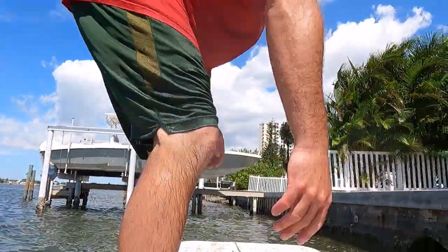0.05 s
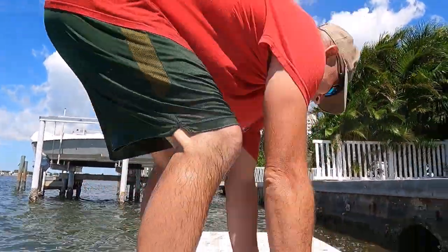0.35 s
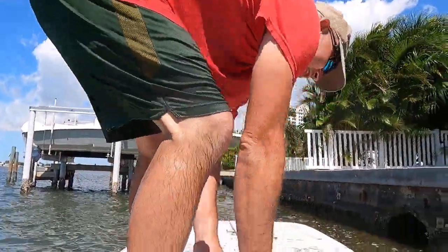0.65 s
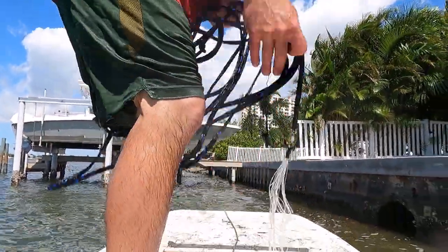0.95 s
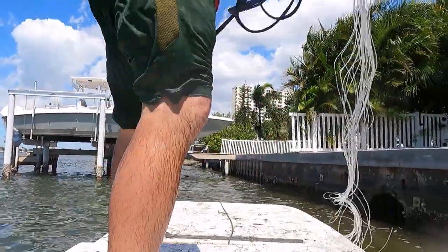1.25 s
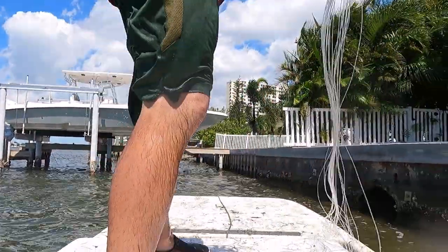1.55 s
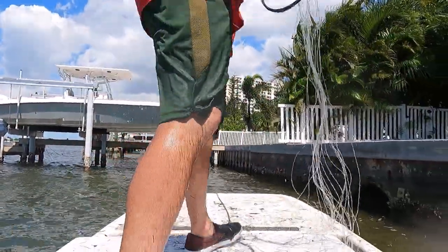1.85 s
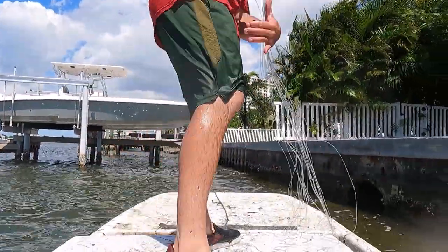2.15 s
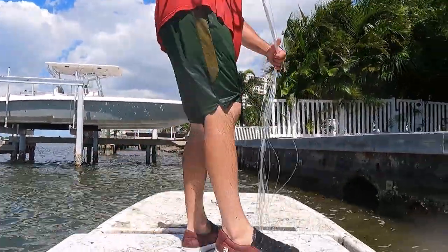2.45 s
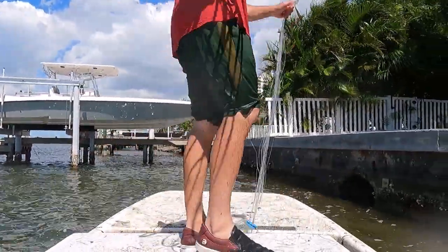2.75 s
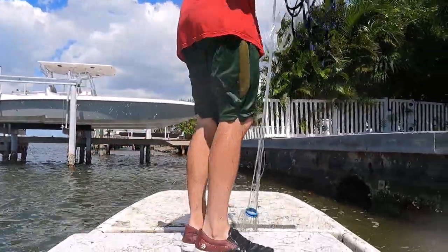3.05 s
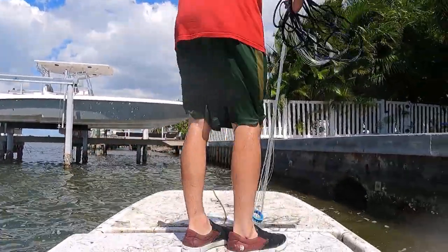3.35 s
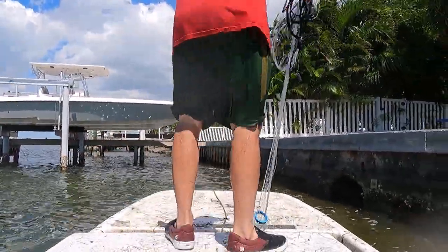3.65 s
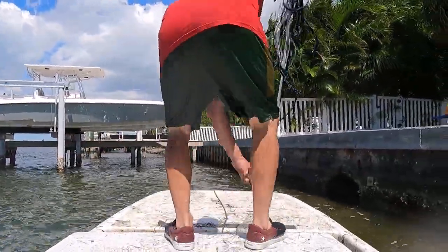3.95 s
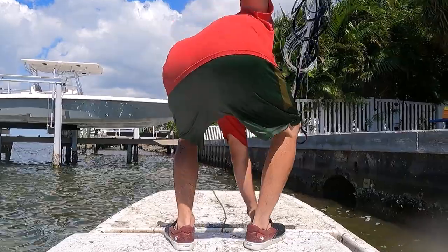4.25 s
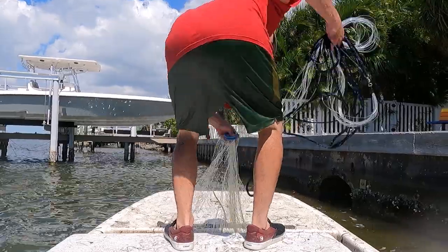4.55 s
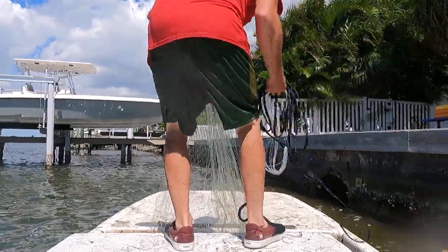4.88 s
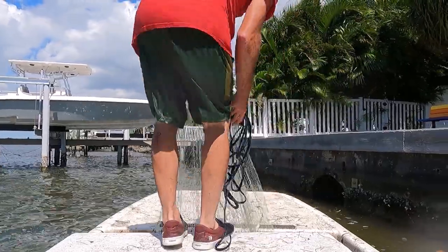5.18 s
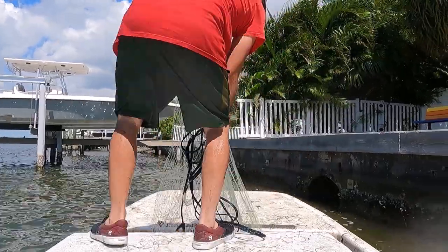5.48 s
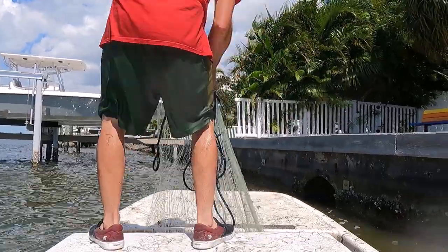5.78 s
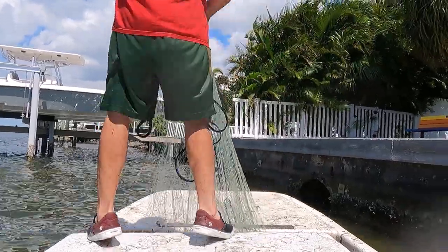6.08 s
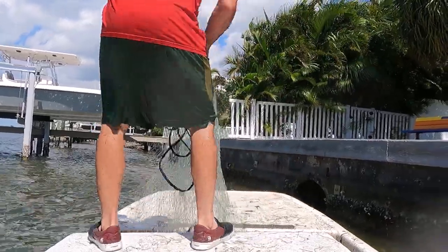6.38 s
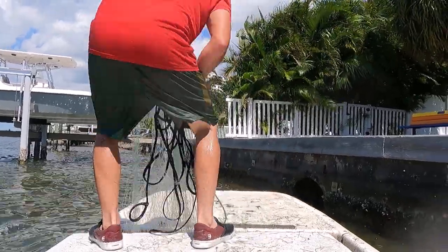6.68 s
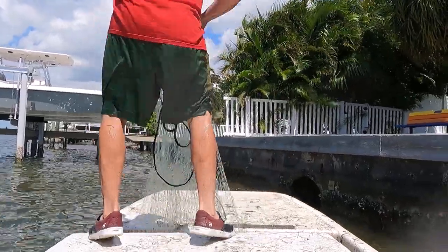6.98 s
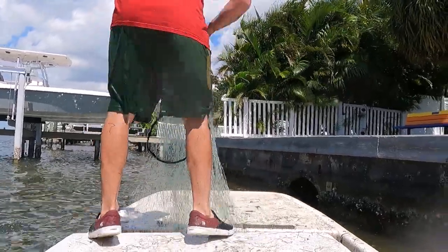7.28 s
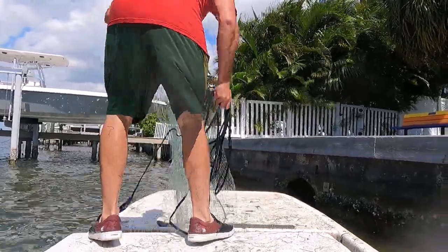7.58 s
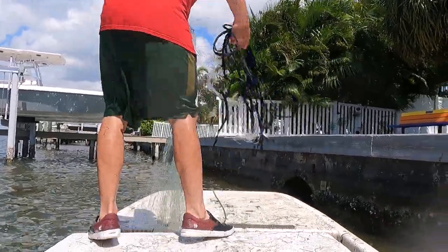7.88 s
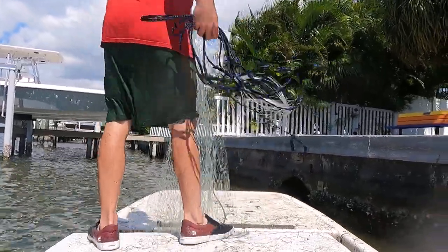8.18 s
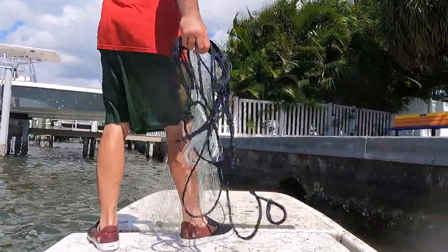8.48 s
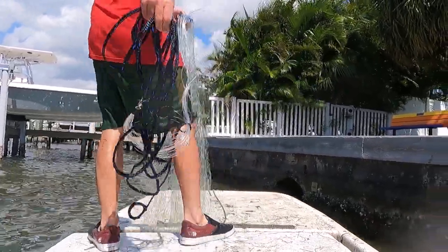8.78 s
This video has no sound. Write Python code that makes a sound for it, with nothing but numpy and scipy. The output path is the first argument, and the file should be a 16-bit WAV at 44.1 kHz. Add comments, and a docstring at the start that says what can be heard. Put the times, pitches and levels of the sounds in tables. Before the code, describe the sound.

Wavelets thump and slap a small boat's hollow hull as a wet net swishes and drips, with wind rumbling on the microphone.

```python
"""A wet cast net is hauled up at the bow of a small boat, in a breeze.
From the start wind rumbles on the microphone over a faint drone, and wavelets gurgle, thump and slap
against the hollow hull. Pull after pull the mesh swishes, flicks and sheds plopping drops. The heaviest
thump lands just after 3 s, and the high hiss dulls until about 5 s. Near 6 s the net hangs clear and
drains hardest while wet rope rasps through the hand; the wavelets keep knocking to the end."""
import sys
import numpy as np
from scipy import signal
from scipy.fft import rfft, irfft, next_fast_len
from scipy.io import wavfile

SR = 44100
rng = np.random.default_rng(int(sys.argv[2]) if len(sys.argv) > 2 else 0)


def waveform_to_disk(signal):
    """Save audio, clipped to [-1, 1], as 16-bit WAV at the path in sys.argv[1]."""
    frames = np.transpose(np.atleast_2d(signal))
    scaled = np.clip(frames, -1, 1) * 32767
    samples = np.round(scaled).astype(np.int16)
    wavfile.write(sys.argv[1], SR, samples)


N = 389403
TIME = np.arange(N) / SR
WAVE_RISE, PULL_RISE = 0.52, 0.56  # share of the length spent building up

# Strength of the breeze. Each row: time in seconds, level in dB.
BREEZE_CURVE = [(0.0, -25), (0.17, -24), (0.41, -38), (0.6, -27), (1.11, -31.5), (1.74, -27.5),
                (2.33, -24.5), (2.43, -32.5), (2.68, -30.5), (2.9, -25), (3.4, -20.5), (4.02, -29),
                (4.2, -38.5), (4.6, -29), (5.12, -38), (5.41, -32), (5.7, -35), (6.64, -25.5),
                (6.79, -31.5), (7.3, -26.5), (7.8, -32.5), (8.2, -35), (8.6, -28.5), (8.83, -33)]
# Waves running along the hull. Each row: crest in seconds, gurgle in dB, length in seconds,
# lapping in dB.
PASSING_WAVES = [(0.017, -24.5, 0.2, -36), (0.608, -52, 0.082, -33), (1.295, -32, 0.34, -51),
                 (1.82, -38, 0.41, -42.5), (2.08, -31.5, 0.25, -58), (2.255, -30, 0.22, -40),
                 (3.017, -29.5, 0.23, -40), (3.44, -26.5, 0.23, -50), (4.37, -33.5, 0.27, -51),
                 (4.864, -26.5, 0.24, -43), (6.323, -30, 0.33, -51), (6.58, -31.5, 0.2, -37),
                 (6.87, -34, 0.19, -60), (7.48, -23.5, 0.3, -31.5), (7.944, -28, 0.18, -54),
                 (8.402, -28, 0.07, -35.5), (8.58, -37, 0.22, -40.5)]
# Pulls on net and rope. Each row: fastest moment in seconds, rustle in dB, length in seconds,
# spray offset in dB.
NET_PULLS = [(0.112, -39, 0.23, -33), (0.202, -38, 0.07, -25), (0.332, -45, 0.35, -36),
             (0.649, -41.5, 0.16, -18.5), (0.897, -46.5, 0.2, -20), (1.157, -45.5, 0.2, -37),
             (1.398, -44.5, 0.079, -20), (1.64, -39.5, 0.048, -27), (2.09, -35.5, 0.1, -36),
             (2.224, -38, 0.12, -44), (2.43, -46.5, 0.46, -37), (3.107, -42, 0.4, -27),
             (3.47, -45.5, 0.49, -26), (3.944, -37, 0.053, -36), (4.051, -42.5, 0.17, -27),
             (4.723, -45.5, 0.45, -27), (5.212, -41.5, 0.16, -20), (5.525, -50.5, 0.19, -10),
             (6.802, -46, 0.13, -24), (7.172, -40, 0.11, -23), (7.566, -44, 0.34, -30),
             (7.86, -42, 0.054, -35), (8.412, -42.5, 0.08, -31), (8.613, -42, 0.048, -24)]
# Level of the net's steady patter, and of the fine high hiss, which dulls from about 3 to 5 s.
# Each row: time in seconds, patter in dB, high hiss in dB.
PATTER_AND_HISS = [(0, -59.5, -76), (1.3, -49, -71.5), (2.8, -49.5, -74), (3.7, -49, -96),
                   (4.3, -49.5, -82), (5.05, -48, -71), (5.8, -43.5, -65.5), (7.2, -46, -68),
                   (8.2, -49.5, -74), (8.83, -47, -69)]
# Tone of trickling water and of wet mesh. Each row: frequency in Hz, level in dB.
TRICKLE_EQ = [(250, -5.5), (480, -2), (680, -8.5), (920, 1.5), (1400, -2.5), (2000, -8.5), (3000, -16.5),
              (6000, -33)]
MESH_EQ = [(800, 5.5), (1800, 1), (3000, 0), (4300, -0.5), (5500, -8), (8000, -13), (10500, -24),
           (12500, -43)]


def amp(db):
    """Decibels to gain."""
    return 10 ** (np.asarray(db) / 20)


def unit(x):
    """Scales to rms 1."""
    return x / np.sqrt(np.mean(x ** 2) + 1e-20)


def peaked(x):
    """Scales to peak 1."""
    return x / (abs(x).max() + 1e-12)


def level(curve, column=1):
    """Gain over time from one dB column of a curve."""
    columns = np.transpose(curve)
    return amp(np.interp(TIME, columns[0], columns[column]))


def add(mix, start, sound):
    """Mixes a sound in at a start time in seconds."""
    part = mix[max(round(start * SR), 0):][:len(sound)]
    part += sound[:len(part)]


def colour(x, eq):
    """Shapes a sound with an EQ curve that rolls off steeply past its last point, at rms 1."""
    hz, db = np.transpose(eq)
    size = next_fast_len(len(x))
    f = np.fft.rfftfreq(size, 1 / SR)
    gain = amp(np.interp(np.log(f + 1), np.log(hz), db)) / np.maximum(f / hz[-1], 1) ** 3
    return unit(irfft(rfft(x, size) * gain, size)[:len(x)])


def flutter(per_s, depth_db):
    """A gain that wanders at random."""
    knots = rng.standard_normal(4000)
    return unit(amp(depth_db * np.interp(TIME * per_s, np.arange(len(knots)), knots)))


def patter(size, per_s, spread_db):
    """Random impulses, most small and a few large."""
    sizes = amp(spread_db * np.minimum(rng.exponential(1, size), 4))
    return sizes * rng.choice([-1, 1], size) * (rng.random(size) < per_s / SR)


def fade(t, rise, t60):
    """Soft attack and exponential decay."""
    return (1 - np.exp(-(t / rise) ** 2)) * np.exp(-np.log(1000) * t / max(t60, rise))


def bubble(t, hz, t60, rise, glide):
    """Trapped air rings; its pitch climbs as it nears the surface."""
    pitch = hz * (1 + glide * np.minimum(t / t60, 1))
    return fade(t, rise, t60) * np.sin(2 * np.pi * np.cumsum(pitch) / SR)


def fizz(low_hz, high_hz, per_s, spread_db, cycles, count=40):
    """A shower of tiny ringing grains at many pitches across a range."""
    out, t = np.zeros(N), np.arange(SR // 20) / SR
    for hz in np.geomspace(low_hz, high_hz, count) * rng.uniform(.98, 1.02, count):
        grain = bubble(t, hz, t60=cycles / hz, rise=2 / hz, glide=0.15)
        out += signal.oaconvolve(patter(N, per_s / count, spread_db), grain)[:N]
    return unit(out)


def scatter(x, t60, wet_db):
    """Short diffuse reflections from deck, water and sea wall."""
    t = np.arange(SR // 3) / SR
    tail = rng.standard_normal(len(t)) * fade(t, 0.0061, t60)
    return x + amp(wet_db) * signal.oaconvolve(x, tail / np.linalg.norm(tail))[:N]


def surges(rows, rise):
    """Power of smooth swells. Each row begins: crest in seconds, level in dB, length in seconds."""
    t, power = TIME[::64], 0
    for crest, db, length, *_ in rows:
        width = length * np.where(t < crest, rise, 1 - rise)
        power += amp(db) ** 2 / np.cosh(2 * np.clip((t - crest) / width, -10, 10)) ** 2
    return np.interp(TIME, t, power)


def wind():
    """Lumpy turbulence and harder buffets at the microphone, plus the rumble of the boat riding waves."""
    # Gusts hitting the microphone. Each row: crest in seconds, level in dB, length in seconds.
    gusts = [(0.08, -20, 0.065), (2.1, -22, 0.098), (2.27, -21.5, 0.21), (2.88, -22, 0.16),
             (3.55, -23.5, 0.16), (4.95, -18, 0.046), (8.4, -18, 0.096)]
    # Tone of the rumble and of the gusts. Each row: frequency in Hz, level in dB.
    rumble_eq = [(8, -35), (25, -2), (55, -1.5), (100, -3.5), (160, -13.5), (300, -31)]
    gust_eq = [(15, -3), (45, 6), (85, -3), (140, -35)]
    heave = amp(-1) ** 2 * surges(PASSING_WAVES, WAVE_RISE)
    strength = np.sqrt(level(BREEZE_CURVE) ** 2 + heave)
    rumble = colour(rng.standard_normal(N) * flutter(per_s=31, depth_db=2), rumble_eq)
    eddies = np.sign(colour(rng.standard_normal(N), gust_eq))  # clipped to an even force
    return strength * rumble + np.sqrt(surges(gusts, rise=0.42)) * colour(eddies, gust_eq)


def drone(hz=94.7, width_hz=15):
    """A faint low drone wavers, and swells and eases with the breeze."""
    f = np.fft.rfftfreq(N, 1 / SR)
    hum = irfft(rfft(rng.standard_normal(N)) / (1 + (2 * (f - hz) / width_hz) ** 2), N)
    return amp(-41.5) * unit(hum * level(BREEZE_CURVE))


def slosh():
    """Water gurgles along the hollow hull as each wave passes, over ripples that never stop."""
    # Hollow tone of the gurgle. Each row: frequency in Hz, level in dB.
    gurgle_eq = [(60, -11), (120, 0.5), (180, 0), (270, -6), (430, -16.5), (650, -22), (1200, -49)]
    stir = unit(patter(N, per_s=250, spread_db=3)) + rng.standard_normal(N)
    ripples = amp(-40.5) ** 2
    strength = np.sqrt(ripples + surges(PASSING_WAVES, WAVE_RISE))
    return amp(2.76) * strength * colour(stir * flutter(per_s=20, depth_db=3.8), gurgle_eq)


def trickle():
    """Many small bubbles from the dripping net, over the wash of lapping waves."""
    bubbles = fizz(430.5, 1900, per_s=420, spread_db=2.3, cycles=12.6)
    bubbles = unit(scatter(bubbles, t60=0.052, wet_db=-5))
    wash = rng.standard_normal(N) * flutter(per_s=28, depth_db=5)
    ripples = amp(-64) ** 2
    lapping = surges([(crest, db, length) for crest, _, length, db in PASSING_WAVES], WAVE_RISE)
    shaken_drops = surges(NET_PULLS, PULL_RISE)
    dripping = (amp(3) * level(PATTER_AND_HISS)) ** 2
    strength = np.sqrt(ripples + lapping + shaken_drops + dripping)
    return amp(-1.5) * strength * colour(bubbles + amp(6) * wash, TRICKLE_EQ)


def net():
    """Pulled strands rub, crackle as water films burst, and fling spray; drops tick under a high hiss."""
    # Airy tone of the high hiss. Each row: frequency in Hz, level in dB.
    hiss_eq = [(4000, -6.5), (8000, -8.5), (11000, -15), (12300, -12.5), (14000, -17), (15500, -25)]
    crackle = fizz(1696, 12150, per_s=1500, spread_db=3, cycles=45)
    rubbing = rng.standard_normal(N) * flutter(per_s=55, depth_db=2.5)
    ticks = unit(scatter(patter(N, per_s=22, spread_db=3), t60=0.028, wet_db=2))
    sizzle = rng.standard_normal(N) + fizz(7000, 14500, per_s=680, spread_db=3, cycles=45, count=16) / 2
    rustle = colour(rubbing + amp(-8) * crackle + amp(-15) * ticks, MESH_EQ)
    hiss = colour(sizzle * flutter(per_s=16, depth_db=1.5) + ticks / 2, hiss_eq)
    flings = [(crest, db + spray_db, length) for crest, db, length, spray_db in NET_PULLS]
    rustle_gain = np.sqrt(level(PATTER_AND_HISS) ** 2 + surges(NET_PULLS, PULL_RISE))
    hiss_gain = np.sqrt(level(PATTER_AND_HISS, column=2) ** 2 + surges(flings, PULL_RISE))
    return rustle_gain * rustle + amp(7) * hiss_gain * hiss


def thumps():
    """A wavelet traps air under the bow: it booms, knocks the panels and breaks up."""
    # Wavelets under the hull. Each row: time in seconds, level in dB, air pitch in Hz, knock in dB.
    wavelets = [(0.056, -20.5, 205, -16), (0.057, -20, 447, -24), (0.296, -14.5, 159, -42),
                (0.667, -17.5, 115, -15.5), (1.373, -22.5, 282, -25), (1.521, -13.5, 278, -28),
                (1.523, -14, 136, -36), (1.654, -15, 190, -44), (2.161, -21, 125, -26),
                (2.24, -22, 145, -6.5), (2.906, -22.5, 139, -4.5), (3.182, -6.5, 179.8, -14),
                (3.199, -4, 104.5, -29), (3.255, -14, 113, -26), (3.448, -17, 134, -13.5),
                (3.557, -16, 197, -18), (3.6, -17.5, 205, -9.5), (3.717, -17.5, 121, -13.5),
                (4.358, -30, 430, -5), (4.515, -20, 226, -23), (4.811, -9.5, 404, -16),
                (4.819, -8, 199.4, -19), (5.388, -11.5, 168.3, -16), (5.614, -16.5, 181, -25),
                (6.014, -13.5, 212.6, -12), (6.022, -14, 145.5, -16.5), (6.419, -7.5, 126, -32),
                (6.577, -12, 145.4, -19), (6.764, -21.5, 276, -15), (6.948, -12, 171, -31),
                (6.993, -13, 158, -40), (7.415, -21.5, 304, -10), (7.549, -17.5, 145, -15),
                (7.552, -18, 535, -32), (7.627, -13.5, 168, -39), (7.848, -11.5, 223, -21),
                (7.864, -7.5, 189, -39), (7.916, -13.5, 134, -6.5), (8.383, -17, 195, -17),
                (8.419, -20.5, 120, -7.5), (8.61, -14.5, 133, -36)]
    # Modes of the hull panels. Each row: frequency in Hz, level in dB, time to fall 60 dB in seconds.
    panel_modes = [(227.7, -10.5, 0.16), (297.5, -17, 0.33), (326, -0.5, 0.12), (381, -5, 0.18),
                   (422, -4.5, 0.12), (498.6, -0.5, 0.075)]
    # Dull tone of churned water. Each row: frequency in Hz, level in dB.
    churn_eq = [(50, -25), (130, -6), (250, -2), (400, -12)]
    out, t = np.zeros(N), np.arange(SR // 2) / SR
    for start, db, hz, knock_db in wavelets:
        # Large, low pockets ring longest.
        pocket = bubble(t, hz, t60=0.11 * np.sqrt(200 / hz), rise=0.0059, glide=0.024)
        load = 1 + 0.0875 * rng.uniform(-1.04, 1)  # water against the panels shifts their pitch
        panels = np.zeros(len(t))
        for mode_hz, mode_db, t60 in panel_modes:
            mode = np.sin(2 * np.pi * (mode_hz * load * t + rng.random()))
            panels += amp(mode_db) * fade(t, 0.0043, t60) * mode
        churn = colour(rng.standard_normal(len(t)), churn_eq) * fade(t, 0.007, 0.21)
        water = amp(-11) * peaked(churn) + amp(-15) * fragments(t, hz)
        thump = amp(-3.5) * peaked(pocket) + amp(knock_db + 7.5) * peaked(panels) + water
        add(out, start - .002, amp(db) * thump)
    return scatter(out, t60=0.13, wet_db=-11)


def fragments(t, hz, count=4, breakup_s=0.1):
    """A pocket of air breaks into smaller ones that gulp one after another, ever weaker."""
    out = np.zeros(len(t))
    for late, pitch_lift in rng.random((count, 2)):
        gulp = bubble(t, min(hz, 250) * (1 + pitch_lift), t60=0.058, rise=0.0036, glide=0.075)
        add(out, late * breakup_s, amp(-10 * late) * peaked(gulp))
    return out


def slaps():
    """A sheet of water smacks shut: a sharp crack, a short-lived cavity and a brief splash."""
    # Slaps beside the hull. Each row: start in seconds, level in dB, cavity pitch in Hz.
    smacks = [(0.056, -25.5, 940), (0.667, -31, 960), (0.843, -34, 1100), (1.071, -32, 1005),
              (1.221, -24.5, 945), (1.606, -31, 910), (2.199, -30.5, 1140), (2.297, -26.5, 964),
              (2.956, -30.5, 1465), (3.376, -29, 940), (3.477, -31, 810), (3.94, -27.5, 1130),
              (4.809, -25.5, 755), (5.382, -29.5, 936), (5.566, -27.5, 945), (5.761, -31.5, 1530),
              (6.036, -29, 974), (6.458, -31.5, 983), (6.489, -25, 1434), (6.724, -26.5, 1020),
              (6.823, -21, 970), (7.117, -30, 1060), (7.452, -25.5, 920), (7.549, -29, 1980),
              (7.617, -31.5, 1070), (7.919, -28.5, 1000), (8.343, -32.5, 900), (8.711, -29, 1627),
              (8.795, -31.5, 1070)]
    # Tone of the crack and splash. Each row: frequency in Hz, level in dB.
    crack_eq = [(150, 1), (420, 8.5), (680, 6), (1000, 4.5), (1800, -1.5), (2600, -12), (5000, -21.5),
                (12000, -61)]
    out, t = np.zeros(N), np.arange(SR // 5) / SR
    envelope = fade(t, 0.0013, 0.067) + amp(-21) * fade(t, 0.0012, 0.12)
    for start, db, hz in smacks:
        crack = colour(rng.standard_normal(len(t)), crack_eq) * envelope
        cavity = bubble(t, hz, t60=0.035, rise=0.00028, glide=0.066)
        add(out, start, amp(db + 2.5) * (crack + peaked(cavity)))
    return scatter(out, t60=0.08, wet_db=-9)


def rope_rubs(pitch_ratio=1.284):
    """Taut wet rope slips through the hand: its strands catch and squeak, each at its own pitch."""
    # Slips of the rope. Each row: fastest moment in seconds, level in dB, length in seconds,
    # centre of the rasp in Hz.
    slips = [(0.112, -39.5, 0.16, 2420), (5.914, -40.5, 0.24, 1500), (6.806, -36.5, 0.02, 2500)]
    out = np.zeros(N)
    for crest, db, length, hz in slips:
        rasp = fizz(hz / pitch_ratio, hz * pitch_ratio, per_s=1500, spread_db=4, cycles=37, count=10)
        out += np.sqrt(surges([(crest, db, length)], PULL_RISE)) * rasp
    return out


def flicks():
    """Wet mesh and rope brush past each other in short, clicky bursts; the quickest ones snap."""
    # Flicks of the mesh. Each row: time in seconds, level in dB, top treble in dB, rise in seconds.
    strokes = [(0.193, -32.5, -27, 0.014), (0.374, -38, -23, 0.0045), (1.22, -35, -34, 0.005),
               (1.309, -34, -24, 0.015), (1.511, -38, -18, 0.011), (1.793, -34.5, -24, 0.014),
               (2.273, -26.5, -48, 0.007), (2.3, -36, -21, 0.0039), (2.571, -30.5, -14.5, 0.011),
               (2.621, -30, -22, 0.0083), (3.093, -33, -29, 0.0047), (3.119, -31.5, -24, 0.006),
               (3.179, -30.5, -29, 0.011), (3.253, -27, -38, 0.0057), (3.443, -27.5, -32, 0.011),
               (3.508, -29.5, -42, 0.011), (4.641, -33.5, -21, 0.0078), (4.698, -29, -28, 0.01),
               (5.377, -25.5, -42, 0.009), (5.469, -24.5, -19.5, 0.008), (5.645, -30, -23, 0.0078),
               (5.753, -32, -21, 0.013), (6.031, -27.5, -25, 0.0059), (6.822, -28.5, -20, 0.0071),
               (6.945, -27.5, -36, 0.0065), (7.158, -29.5, -28, 0.0064), (7.783, -32.5, -38, 0.009),
               (8.707, -33.5, -40, 0.0068)]
    spray_eq = [(3000, -26), (8000, -1), (10800, -16), (12200, -9), (14500, -24)]
    out, t = np.zeros(N), np.arange(SR // 4) / SR
    for start, db, treble_db, rise in strokes:
        hiss = rng.standard_normal((2, len(t)))
        strands, drops = hiss + unit(patter(len(t), per_s=3000, spread_db=1.5)) / 2
        stroke = peaked((t / rise) ** 2 * np.exp(-2 * t / rise))
        snap = amp(6) * np.exp(-rise / 0.005) * fade(np.maximum(t - rise / 2, 0), 0.0002, 0.012)
        rub = colour(strands, MESH_EQ) * (stroke + snap)
        spray = colour(drops, spray_eq) * (np.sqrt(stroke) + snap)  # flung water outlasts the stroke
        add(out, start - .002, amp(db - 4) * (rub + amp(treble_db) * spray))
    return out


def plops():
    """Single drops splash lightly and leave one ringing bubble each."""
    # Falling drops. Each row: start in seconds, level in dB, bubble pitch in Hz, splash offset in dB.
    drops = [(0.257, -32, 1070, 0), (0.478, -36, 1624, -24), (1.033, -20.5, 966, -17),
             (1.663, -26, 1440, -8), (2.017, -28, 886, -12), (3.118, -27, 1800, -16),
             (5.064, -27.5, 795, -13), (6.126, -27, 920, -7), (6.701, -19.5, 1595, -5.5),
             (7.007, -29.5, 855, -3), (7.456, -21.5, 1320, -16), (7.725, -23.5, 1307, -5.5),
             (8.087, -31, 786, -2)]
    out, t = np.zeros(N), np.arange(SR // 8) / SR
    for start, db, hz, splash_db in drops:
        splash = colour(rng.standard_normal(len(t)), TRICKLE_EQ) * fade(t, 0.001, 0.084)
        ring = peaked(bubble(t, hz, t60=0.045, rise=0.002, glide=0.11))
        add(out, start, amp(db) * (amp(-5.5) * ring + amp(splash_db) * splash))
    return scatter(out, t60=0.11, wet_db=-10)


def scene():
    """Wind, water and net, heard in mono from the deck."""
    air = wind() + drone()
    water = thumps() + slaps() + plops() + slosh() + trickle()
    haul = net() + rope_rubs() + flicks()
    return (air + water + haul)[None]


def record(dry):
    """The microphone port notches the treble, and a steep low-pass trims the very top."""
    # Narrow notches of the port. Each row: centre in Hz, width in Hz, gain in dB.
    notches = [(4895, 210, -7.5), (7420, 290, -3.5), (11260, 460, -4.5)]
    f = np.fft.rfftfreq(N, 1 / SR)
    port_db = sum(db * np.exp(-((f - hz) / width) ** 2) for hz, width, db in notches)
    notched = irfft(rfft(dry) * amp(port_db), N)
    low_pass = signal.firwin(511, 15700, window=("kaiser", 9), fs=SR)
    return signal.oaconvolve(notched, low_pass[None], "same")


dry = scene()
out = record(dry)
waveform_to_disk(out)
```